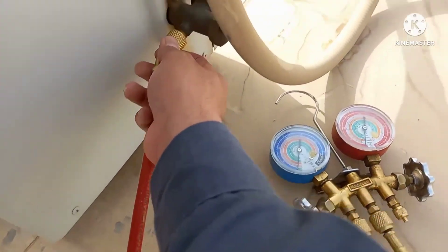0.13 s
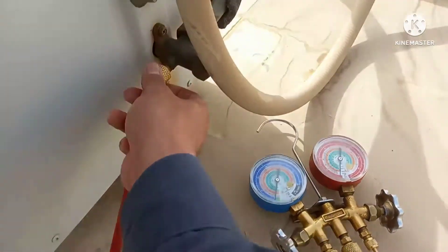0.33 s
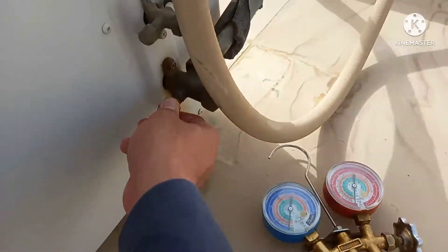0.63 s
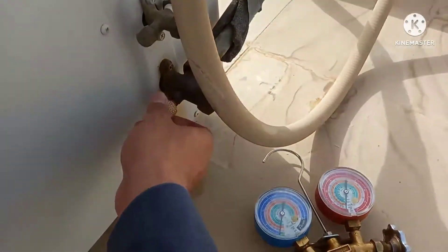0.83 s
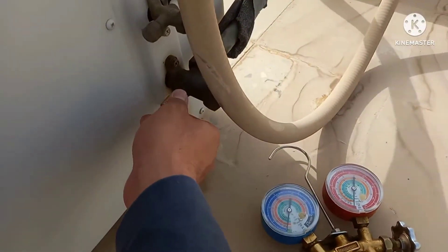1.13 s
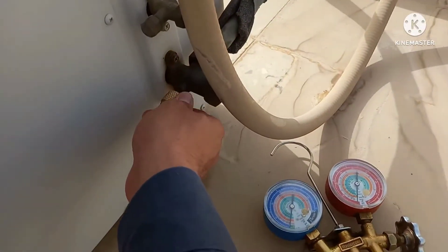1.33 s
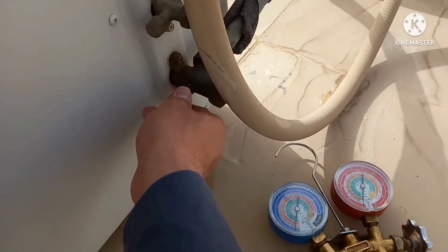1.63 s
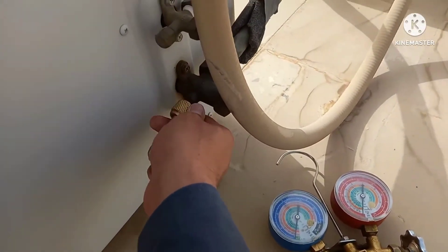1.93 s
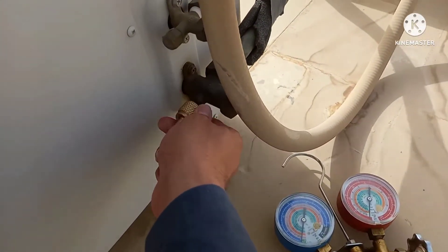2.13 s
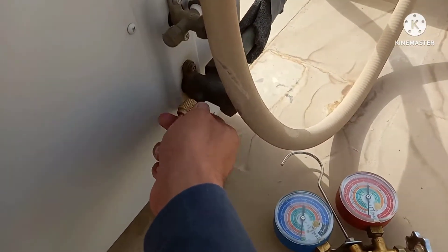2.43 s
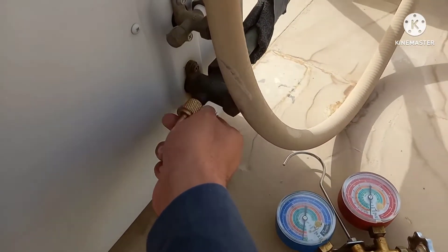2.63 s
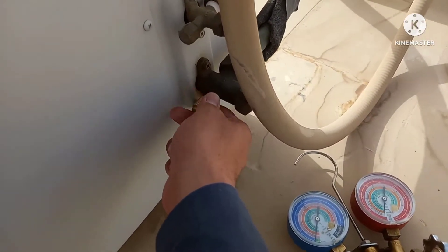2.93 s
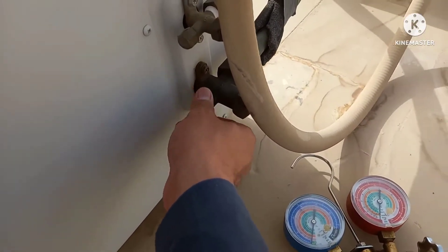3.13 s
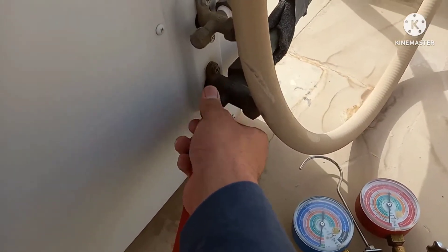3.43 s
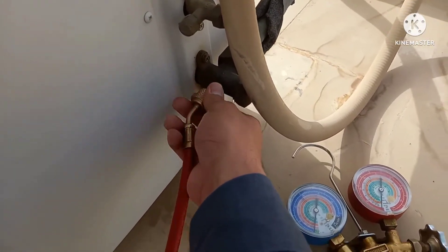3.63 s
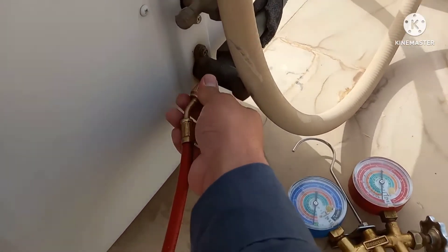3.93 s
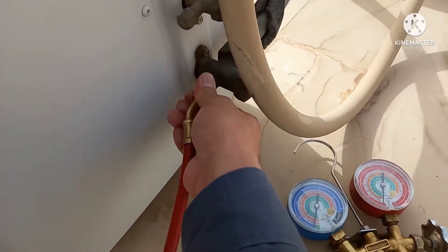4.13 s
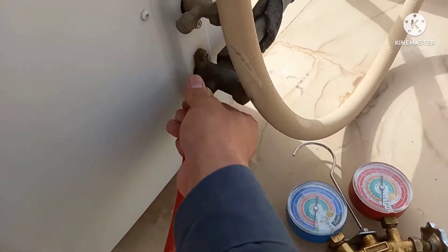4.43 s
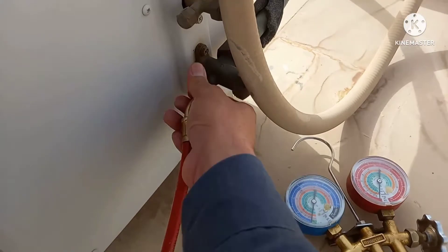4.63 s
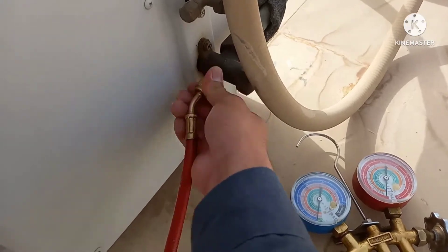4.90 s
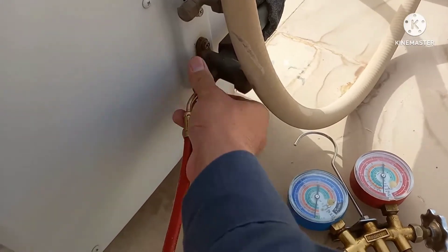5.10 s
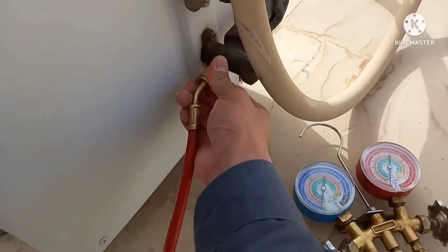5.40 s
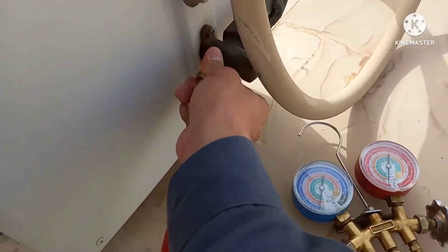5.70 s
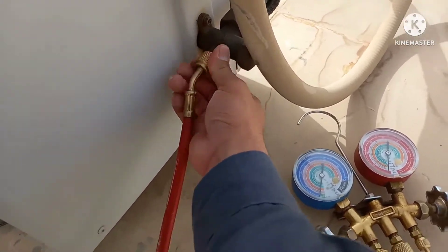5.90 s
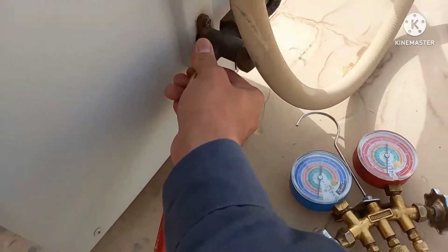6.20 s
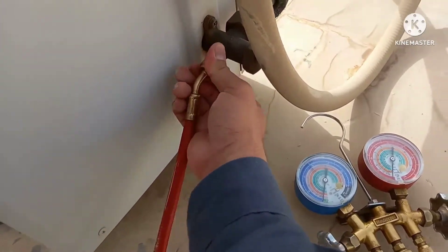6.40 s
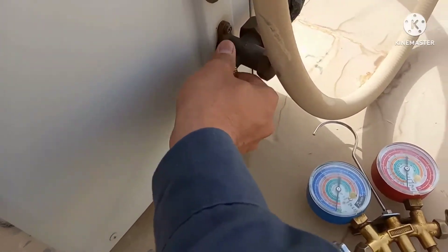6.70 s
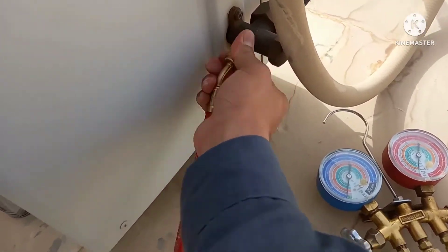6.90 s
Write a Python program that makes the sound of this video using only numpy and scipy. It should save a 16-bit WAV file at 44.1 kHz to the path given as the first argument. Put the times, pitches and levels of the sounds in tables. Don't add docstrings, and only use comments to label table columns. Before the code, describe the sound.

A loud, steady low machine drone dominates, pulsing slowly as two compressors and a fan beat together, with casing rumble and a softer breathy airflow hiss. Faint, dry skin friction on brass repeats in short strokes slightly to the left, with a few tiny metal ticks. In the second half, wind pops and flutters against the right microphone, close up in open rooftop air.

```python
import sys
import numpy as np
from scipy import signal
from scipy.fft import rfft, irfft, next_fast_len
from scipy.io import wavfile
from scipy.ndimage import uniform_filter1d, map_coordinates

SR = 44100
rng = np.random.default_rng(int(sys.argv[2]) if len(sys.argv) > 2 else 0)


def volts(x):
    e = np.asarray(x, float) / 20
    return 10 ** e


def to_wav(s):
    ch = np.atleast_2d(s).T
    pcm = np.round(np.clip(ch, -1, 1) * 32767)
    wavfile.write(sys.argv[1], SR, pcm.astype(np.int16))


N = 310949

# (multiple, left [dB], right [dB])
COMPRESSOR = [(1, -51, -50), (2, -40, -43), (3, -39, -41.5), (4, -39.5, -40), (5, -70, -51), (6, -47, -43),
              (7, -44, -42.5), (8, -58, -55), (9, -60, -66), (10, -64, -61), (13, -46, -55), (14, -51, -72),
              (15, -54, -68), (16, -58, -66), (17, -61, -79), (18, -60, -66), (19, -65, -63),
              (21, -72, -73), (24, -81, -70), (26, -67, -71), (27, -62.5, -68), (28, -69, -74),
              (30, -73, -78), (34, -79, -71)]
# (multiple, left [dB], right [dB])
WHINE = [(45, -83, -75), (97, -80, -82), (112, -80, -82)]
# (multiple, left [dB], right [dB])
HUM = [(1, -34, -33), (2, -48, -49), (3, -60, -58)]
# (multiple, left [dB], right [dB])
BLADES = [(1, -40, -37), (2, -43, -36.5), (3, -39, -37), (4, -52, -49), (5, -52, -49), (6, -54, -50)]
# (multiple, left [dB], right [dB])
NEIGHBOUR = [(1, -42, -42), (2, -36, -36), (3, -45, -45), (4, -54, -54), (6, -53, -53), (7, -55, -55)]
# (time [s], gain [dB])
NEAR = [(0.0, -2), (0.13, -3), (0.36, -4), (0.62, -5), (1.53, -1), (2.63, -1), (2.9, -1), (3.21, -1.15),
        (3.54, -0.3), (3.94, -1.5), (4.58, -1.85), (6.2, -2.5), (6.75, -1), (7.05, -2.1)]
# (time [s], gain [dB])
FACING = [(0, -2.5), (1.2, -6), (2.0, -0.5), (2.8, 3), (3.6, -1.5), (4.3, 2), (5.0, -2.5), (5.8, 3.5),
          (7.05, -3.5)]
# (time [s], gain [dB])
REACH = [(0, -7), (.8, -2.5), (1.35, 3.5), (2.0, 1), (2.5, 4.5), (3.25, 4.5), (3.5, -14), (4.1, -16),
         (4.7, 0), (5.3, -0.5), (6.3, -13), (7.1, -13)]
# (frequency [Hz], density [dB per Hz])
RUMBLE = [(25, -37), (33, -31), (38, -10), (48, -4), (100, 2), (150, 1), (190, -3), (235, -1), (300, -7.5),
          (420, -11.5), (520, -25), (900, -18.5), (1500, -120)]
# (frequency [Hz], share [0-1])
CASING_ALIKE = [(50, 0.81), (100, 0.95), (160, 0.94), (250, 0.89), (400, 0.88)]
# (frequency [Hz], density [dB per Hz])
AIR = [(100, -62), (250, -13.5), (450, -0.5), (650, -1), (850, 0), (1000, -4.5), (1250, -16.5), (1420, -16),
       (1570, -15), (1750, -39), (2100, -25.5), (4000, -120)]
# (frequency [Hz], density [dB per Hz])
JET = [(500, -58), (1000, -0.5), (1250, -1), (1600, 0.5), (2000, -3), (2400, -4), (2800, -4.5),
       (3300, -4.5), (3800, -12), (4800, -18), (7000, -17.5), (16000, -32)]
# (frequency [Hz], left-right [dB])
TILT = [(60, -3), (110, 2), (200, -1), (380, 1.5), (700, -1), (1290, -0.5), (2380, -6), (4400, -3),
        (8120, -3), (15000, -5.5)]
# (frequency [Hz], density [dB per Hz])
SKIN = [(1500, -58), (3000, 3.5), (5000, 0), (6000, -4), (7000, -8.5), (7700, 1.5), (8500, -1),
        (9200, -1.5), (10000, -1.5), (10700, -3), (11600, -1), (13000, -3.5), (13700, -6), (14500, -6.5),
        (15500, -6.5)]
# (time [s], peak [dB], half-length [s])
STROKES = [(.350, -53, 0.046), (.480, -53, .15), (1.000, -53, 0.11), (1.300, -50.5, .25), (1.630, -52, .14),
           (1.930, -47, 0.091), (2.085, -48, 0.028), (2.210, -50, 0.034), (2.360, -49, .06),
           (2.500, -50, 0.11), (2.700, -47.5, 0.037), (2.930, -51.5, 0.064), (3.100, -50.5, .12),
           (3.475, -46.5, 0.095), (3.750, -52, 0.12), (4.020, -47.5, 0.088), (4.235, -52, 0.076),
           (4.560, -49, 0.1), (4.810, -53, 0.19), (5.240, -47.5, 0.067), (5.580, -51.5, 0.16),
           (5.930, -47.5, 0.12), (6.260, -50, 0.052), (6.475, -49, 0.1), (6.740, -50.5, 0.17),
           (7.050, -51, .07)]
# (time [s], peak [dB], lower pitch [Hz], t60 [s], left-right [dB])
TICKS = [(.173, -34, 2950, .012, -9), (.173, -32, 3550, .012, -6), (.173, -26, 8900, .014, -8),
         (.1731, -28, 10200, .01, -8), (.173, -37, 6000, .012, -7), (.043, -42, 3500, .015, -4),
         (.225, -42, 3000, .012, -5), (.395, -40, 1400, .08, 4), (1.68, -41, 11500, .008, -3),
         (1.985, -39, 9000, .008, -3), (1.8417, -37, 6000, .006, -3), (2.156, -41, 3200, .01, -4),
         (2.1907, -29, 1850, .004, -5), (2.1907, -35, 2500, .004, -5), (2.1911, -40, 7500, .005, -5),
         (2.2122, -40, 9000, .03, -3), (3.405, -38, 6500, .01, -3), (3.7549, -36, 6000, .01, -1),
         (4.159, -34, 750, .02, 0), (4.3616, -40, 6000, .01, -3)]
# (time [s], peak [dB], pitch [Hz], half-length [cycles])
VORTICES = [(3.702, -17.5, 124, 1.2), (3.735, -12, 79, 1.1), (3.736, -21, 56, 1.2), (3.737, -16, 124, 1.2),
            (3.744, -15.5, 218, 1.1), (3.745, -17.5, 307, 1.2), (3.751, -18, 139, 0.5),
            (3.766, -9.5, 139, 0.5), (3.864, -15.5, 274, 0.8), (3.868, -11.5, 111, 0.45),
            (3.888, -10, 124, 0.7), (3.895, -18.5, 218, 1.2), (3.912, -15, 88, 0.8),
            (3.925, -20.5, 218, 1.1), (3.931, -16, 139, 0.8), (3.956, -18, 88, 0.8),
            (4.454, -16, 124, 0.46), (4.5, -25, 124, 1.4), (4.502, -22, 174, 1.2), (4.502, -11.5, 242, 0.5),
            (4.523, -12.5, 70, 0.8), (4.843, -27, 79, 1.2), (5.048, -15, 99, 0.5), (5.049, -22.5, 218, 1.4),
            (5.061, -11, 100, 0.43), (5.078, -19, 70, 0.5), (5.081, -8, 218, 0.8), (5.096, -16, 155, 1.2),
            (5.103, -12.5, 111, 1.3), (5.125, -22, 63, 1.2), (5.173, -23, 88, 0.8), (5.81, -18.5, 340, 0.8),
            (5.811, -21, 197, 1), (5.816, -16, 124, 1.2), (5.835, -13, 88, 0.84), (5.847, -17, 139, 0.87),
            (5.855, -19, 56, 0.8), (6.135, -17, 218, 0.5), (6.144, -19, 174, 0.54), (6.151, -21, 63, 1.2),
            (6.182, -17, 88, 0.5), (6.269, -17, 88, 0.8), (6.3, -9.5, 172, 0.45), (6.308, -18, 174, 0.45),
            (6.31, -13.5, 70, 0.5), (6.326, -20, 88, 0.5)]
# (time [s], peak [dB], half-length [s])
EDDIES = [(1.6, -29, .05), (1.83, -26.5, .08), (2.04, -24, 0.027), (3.73, -24, 0.05), (3.80, -23, 0.022),
          (3.90, -25.5, 0.06), (4.23, -28, 0.023), (4.50, -23.5, 0.05), (4.60, -34, 0.073),
          (4.83, -33, .03), (4.885, -26, .015), (5.08, -22.5, .06), (5.035, -18, .01), (5.19, -21, 0.015),
          (5.24, -23.5, 0.015), (5.29, -28, .03), (5.83, -25.5, 0.036), (5.89, -29, .02), (6.14, -29, .04),
          (6.225, -29, 0.011), (6.30, -25, 0.034), (6.43, -32, 0.037), (6.57, -31, 0.092),
          (6.93, -30, 0.056)]
# (frequency [Hz], density [dB per Hz])
BUFFET = [(25, -40), (36, -18), (48, -3), (91, 0), (150, 2.5), (260, -6.5), (400, -16), (580, -32),
          (1200, -120)]

SHAFT_HZ, MAINS_HZ, BLADE_HZ, NEIGHBOUR_HZ = 58.15, 119.93, 44.98, 58.61
THROB_S, BLADE_S, NEIGHBOUR_S = 0.02, 0.001, 0.022
FAN_LAG_S, JET_LAG_S, NUT_LAG_S = -24 / 44100, -20 / 44100, -23.3 / 44100
CASE_LAG_S, PANEL_HZ = -0.00039, 400
CASING_DB, CASING_GROWS = -27.5, 0.76
JET_DB, JET_GROWS = -45.5, 0.94
SWING_S, SWING_DB, SWING_WIDE_S = 1.84, 1.5, 1
GRIP_DB = -51
EDDY_DROP_DB, STROKE_DROP_DB = 13.5, 5
UPPER_MODE = 1.3
EDDY_CYCLES, EDDY_LEAD_S = 1.1, 0.00894
VORTEX_SAG = 0.12


def machine():
    tones = orders(SHAFT_HZ, COMPRESSOR + WHINE, waver_db=0.8, low_lag_s=CASE_LAG_S)
    tones += orders(MAINS_HZ, HUM, waver_db=0.5)
    fan = orders(BLADE_HZ, BLADES, waver_db=1.0, peak_s=BLADE_S, locked_count=3)
    tones += volts(curve(FACING)) * fan
    second = orders(NEIGHBOUR_HZ, NEIGHBOUR, waver_db=0.8, peak_s=NEIGHBOUR_S)
    tones += volts(curve(REACH)) * second
    return volts(1.4 * curve(NEAR) + 1.5) * tones


def casing():
    rumble = rush(RUMBLE, alike=CASING_ALIKE, lag_s=0, patchy_db=0.08)
    return volts(CASING_DB + CASING_GROWS * curve(NEAR)) * rumble


def airflow():
    low = rush(AIR, alike=[(500, 0.4)], lag_s=FAN_LAG_S, patchy_db=1.28)
    low_db = curve(NEAR) - 36.0 + 0.15 * wobble(11.0)
    jet = rush(JET, alike=[(500, 0.5)], lag_s=JET_LAG_S, patchy_db=1.0, echo=0.3)
    swing_db = SWING_DB * np.exp(-((np.arange(N) / SR - SWING_S) / SWING_WIDE_S) ** 4)
    jet_db = JET_DB + JET_GROWS * curve(NEAR) + swing_db + 0.64 * wobble(14)
    return volts(low_db) * low + volts(jet_db) * jet


def fingers():
    grit = volts(0.94 * wobble(35) + 0.53 * wobble(22))
    skin = rush(SKIN, alike=[(500, 0.42)], lag_s=NUT_LAG_S, patchy_db=1.1)
    pressure = np.hypot(volts(GRIP_DB), swells(STROKES, STROKE_DROP_DB))
    return pressure * volts(-1.1) * grit * skin


def ticks():
    out = np.zeros((2, N + SR))
    t = np.arange(SR // 10) / SR
    for s, db, low_hz, t60, pan_db in TICKS:
        burst = np.zeros(N)
        burst[:len(t)] = rng.standard_normal(len(t)) * volts(-60 * t / t60)
        burst[0] = 1.1 / np.sqrt(t60)

        def ringing(f):
            low, high = [mode(f, hz, 350 + hz * hz / 36000) for hz in (low_hz, UPPER_MODE * low_hz)]
            return low - 0.76 * high

        ring = filtered(burst, ringing)
        ring = ring[:len(t)] / np.abs(ring).max()
        sides_db = np.array([[pan_db / 2], [-pan_db / 2]])
        out[:, round(s * SR):][:, :len(t)] += volts(db + sides_db) * ring
    return out[:, :N]


def wind():
    eddies = rush(BUFFET, alike=[(100, 0)], lag_s=0, patchy_db=5.0)[0]
    eddies = eddies / np.sqrt(np.abs(uniform_filter1d(eddies ** 2, size=1500)) + 0.13)

    def port(hz):
        return 1 / (1 + (36 / (hz + 1)) ** 6)

    def sag(hz):
        cycles = hz * EDDY_LEAD_S - EDDY_CYCLES * np.log(hz + 20)
        return np.exp(2j * np.pi * cycles) * port(hz)

    out = filtered(swells(EDDIES, EDDY_DROP_DB) * eddies, sag)
    t = np.arange(-4000, 4000) / SR
    turns = rng.uniform(0, 2 * np.pi, len(VORTICES))
    for (s, db, hz, half_cycles), turn in zip(VORTICES, turns):
        u = hz * t
        swell = np.exp(-0.5 * (u / half_cycles) ** 2)
        cycles = u - 0.5 * VORTEX_SAG * u * u / half_cycles
        pop = volts(db) * swell * np.cos(2 * np.pi * cycles + turn)
        out[round(s * SR) - 4000:][:len(t)] += pop
    return filtered(out, port) * volts([[-22], [0.4]])


def orders(hz, rows, waver_db, peak_s=THROB_S, locked_count=2, low_lag_s=0):
    t = np.arange(N) / SR - peak_s
    out = np.zeros((2, N))
    for k, left_db, right_db in rows:
        order_hz = k * hz
        turn = 2 * np.pi * order_hz * t + rng.uniform(0, 2 * np.pi) * (k > locked_count)
        lag_s = FAN_LAG_S if order_hz > 500 else low_lag_s * order_hz / PANEL_HZ
        lag = np.pi * order_hz * lag_s * np.array([[-1], [1]])
        level = np.sqrt(2) * volts([[left_db], [right_db]]) * volts(waver_db * wobble(2.94))
        out += level * np.cos(turn + lag)
    return out


def rush(spectrum, alike, lag_s, patchy_db, echo=0.0):
    z = signal.stft(rng.standard_normal((3, N)), nperseg=512)[2]
    field = uniform_filter1d(rng.standard_normal(z.shape[1:]), size=6, axis=0)
    field = uniform_filter1d(field, size=14, axis=1)
    shared, *own = signal.istft(z * volts(patchy_db * unit(field)), nperseg=512)[1][:, :N]

    def share(hz):
        return np.clip(along(alike, hz), 0, 1)

    def ports(hz):
        mirror = np.array([1 + echo * np.exp(-2j * np.pi * hz / 825), 1 + 0 * hz])
        sides = volts(along(TILT, hz) * np.array([[0.5], [-0.5]]))
        return volts(along(spectrum, hz)) * mirror * sides

    left = filtered(shared, lambda hz: np.exp(-2j * np.pi * hz * lag_s))
    pair = filtered(np.array([left, shared]), lambda hz: np.sqrt(share(hz)))
    pair = pair + filtered(np.array(own), lambda hz: np.sqrt(1 - share(hz)))
    return unit(filtered(pair, ports))


def swells(rows, drop_db):
    t = np.arange(N) / SR
    return np.sqrt(sum(volts(db - drop_db * ((t - s) / half_s) ** 2) ** 2 for s, db, half_s in rows))


def mode(f, centre_hz, width_hz):
    return 1j * f * width_hz / (centre_hz ** 2 - f * f + 1j * f * width_hz)


def wobble(rate):
    return map_coordinates(rng.standard_normal(1000), [np.arange(N) * min(rate, 100) / SR])


def curve(rows):
    return np.interp(np.arange(N) / SR, *np.transpose(rows))


def along(points, hz):
    f, v = np.transpose(points)
    return np.interp(np.log(hz + 1), np.log(f + 1), v)


def filtered(x, response):
    m = next_fast_len(N + 8192)
    return irfft(rfft(x, m) * response(np.fft.rfftfreq(m, 1 / SR)), m)[..., :N]


def unit(x):
    return x / np.sqrt(np.mean(x ** 2) + 1e-20)


def scene():
    return machine() + casing() + airflow() + volts(curve(NEAR)) * fingers() + ticks() + wind()


def top_cut(x):
    return signal.sosfilt(signal.butter(12, 15480, fs=SR, output="sos"), x)


def record(dry):
    mix = filtered(dry, lambda hz: hz < 15480)
    return top_cut(mix)


dry = scene()
out = record(dry)
to_wav(out)
```